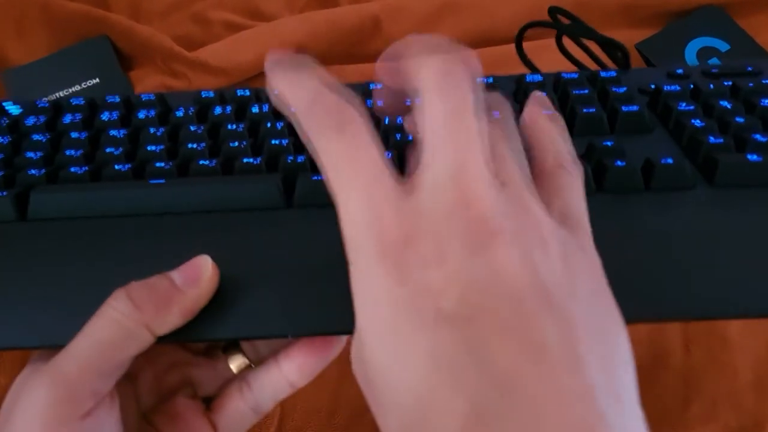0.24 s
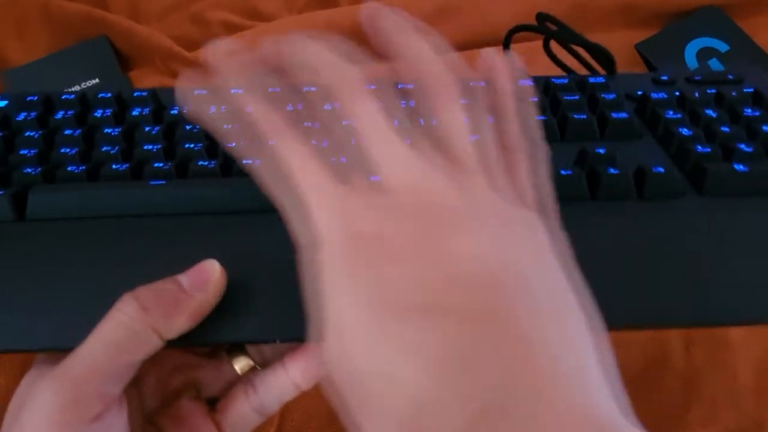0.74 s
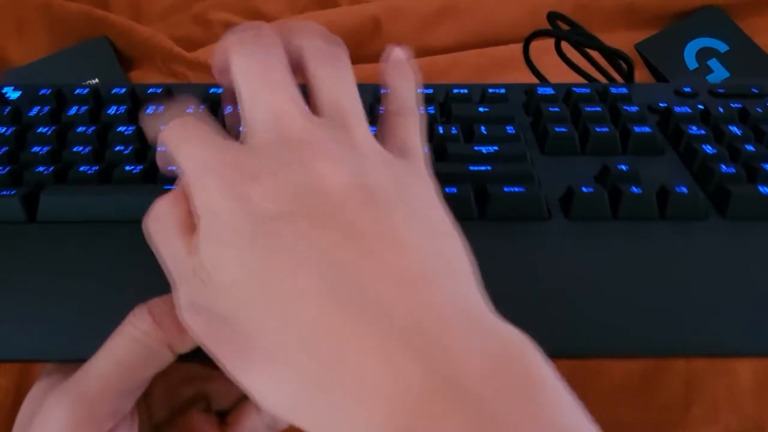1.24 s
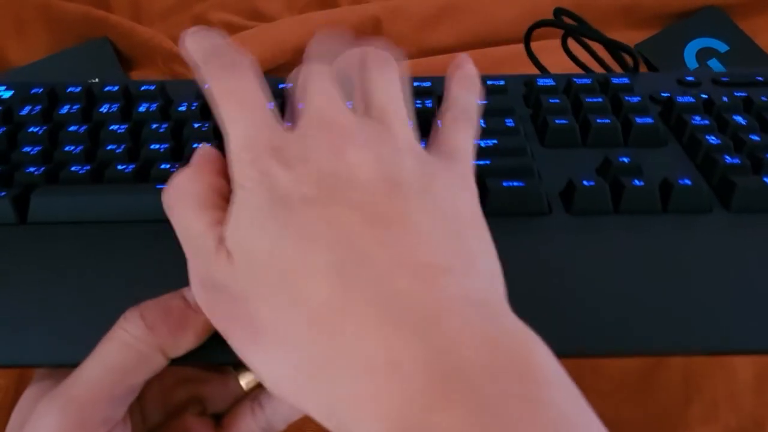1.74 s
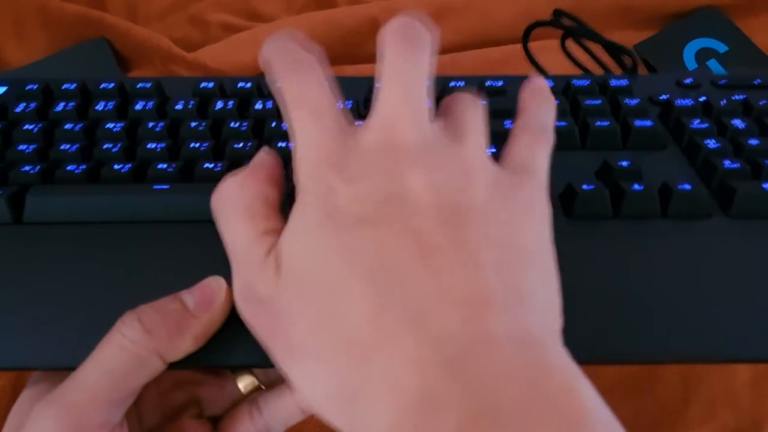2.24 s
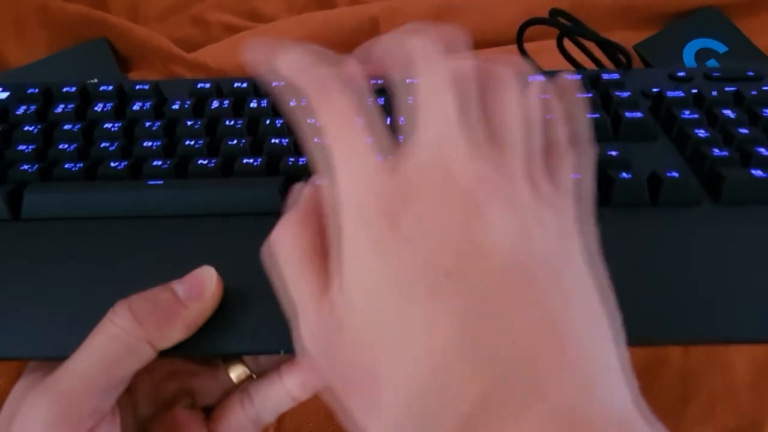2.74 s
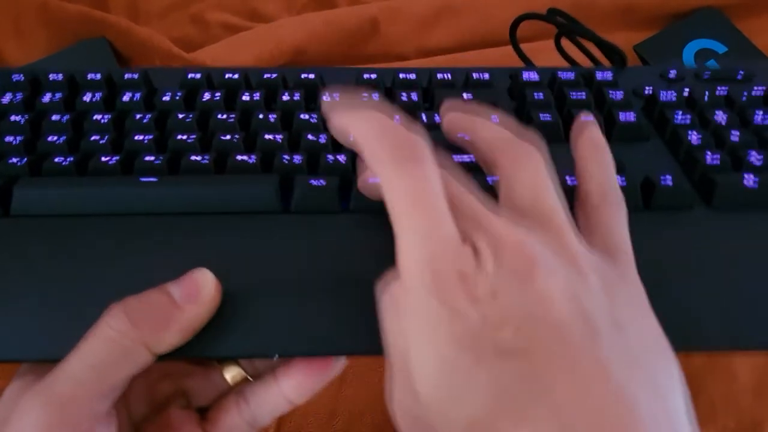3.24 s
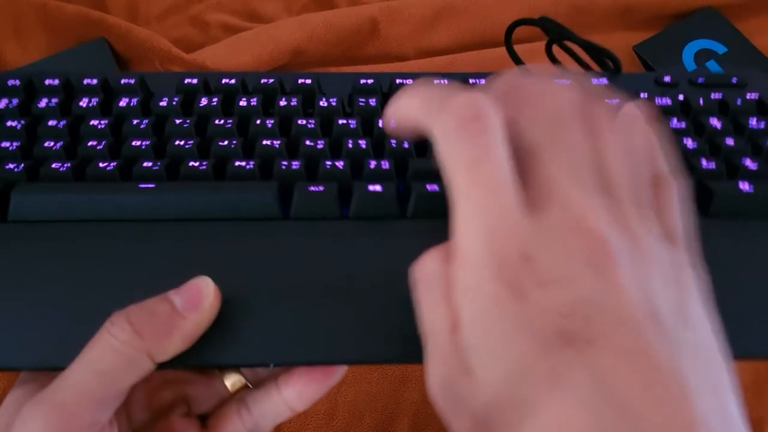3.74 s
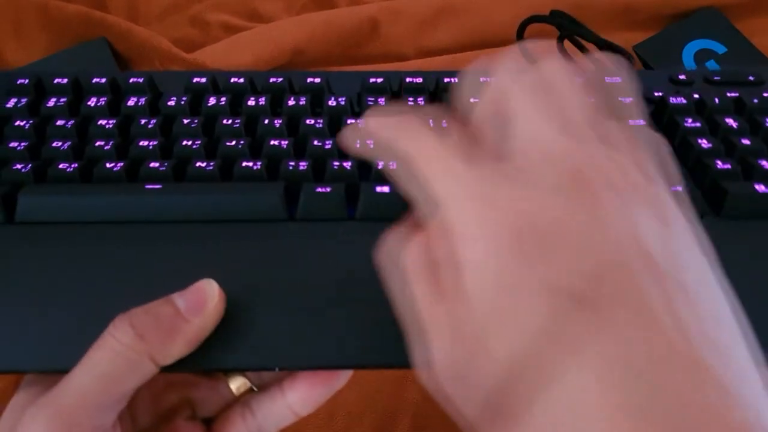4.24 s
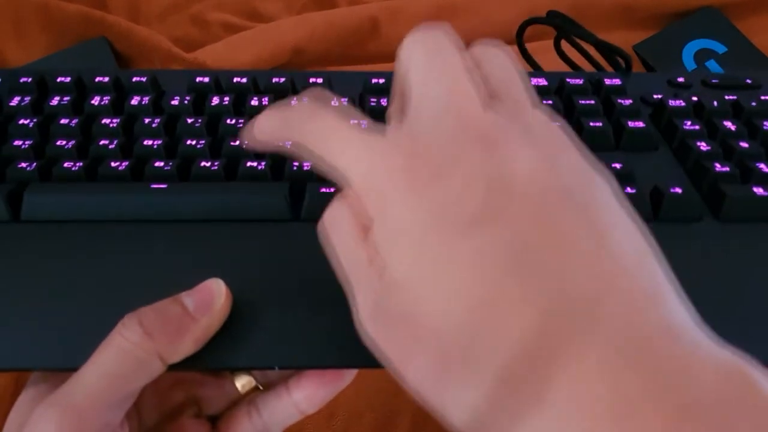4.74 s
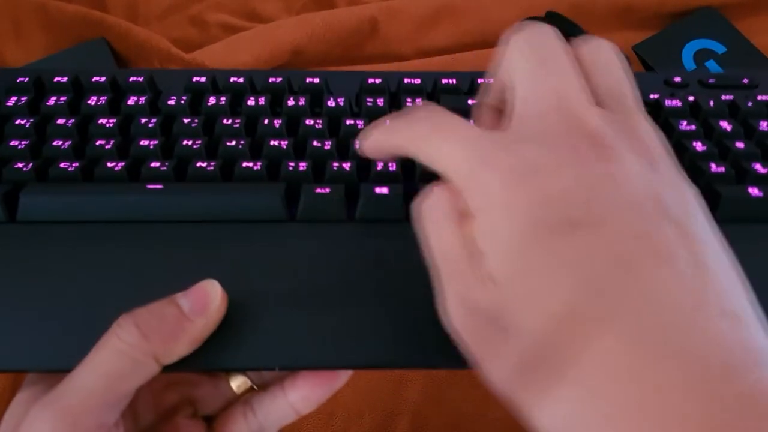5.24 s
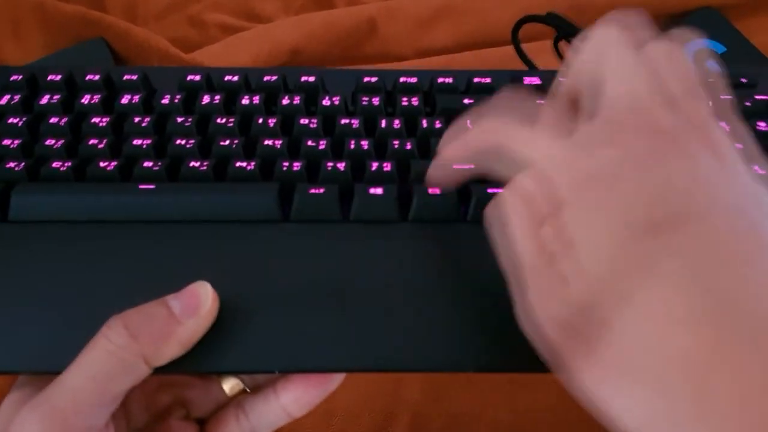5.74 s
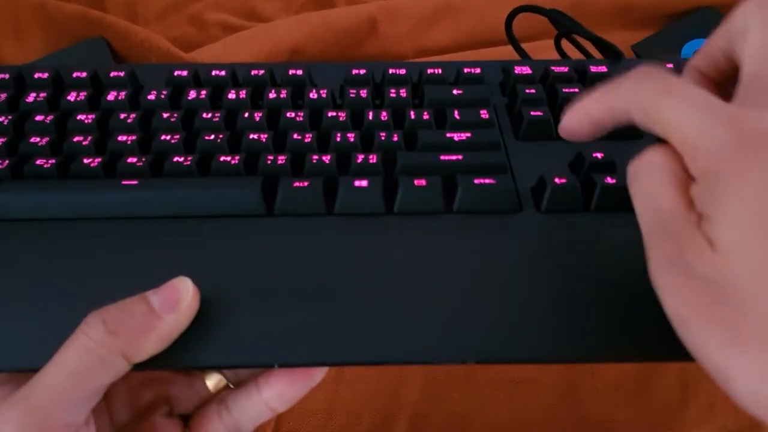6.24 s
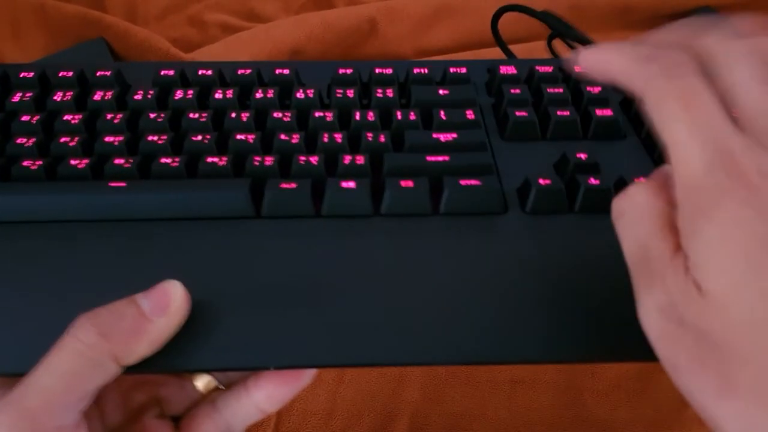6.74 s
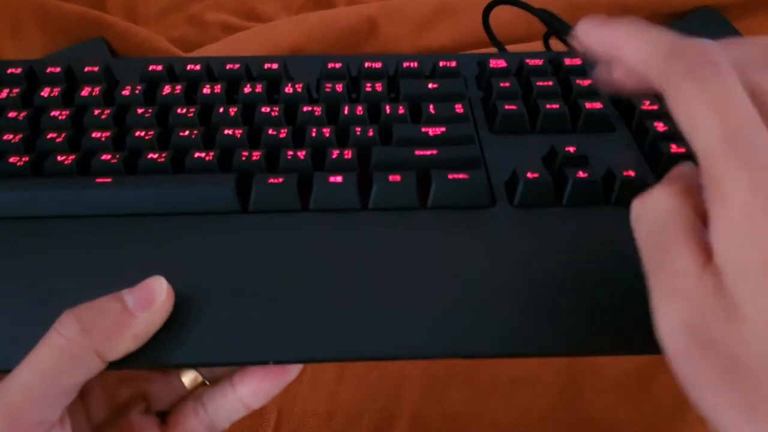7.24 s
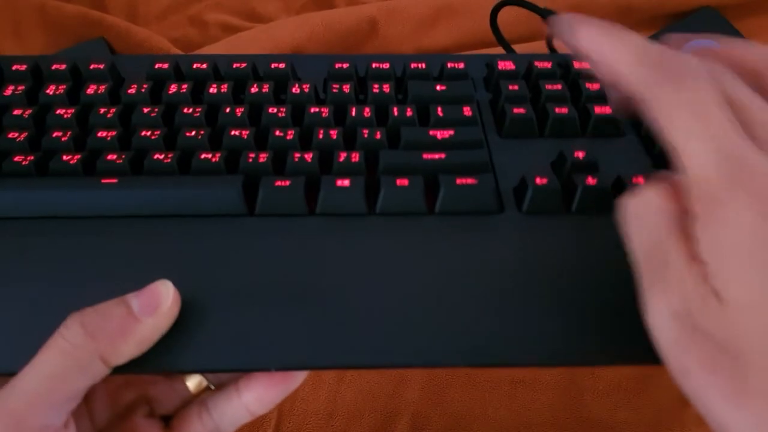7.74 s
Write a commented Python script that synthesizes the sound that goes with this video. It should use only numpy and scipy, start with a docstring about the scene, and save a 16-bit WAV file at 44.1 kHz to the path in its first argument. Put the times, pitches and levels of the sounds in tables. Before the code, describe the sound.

A mechanical keyboard is tested key by key with one hand, close up in a quiet room. About every quarter second a key rattles down with a plastic clack, then snaps back roughly a tenth of a second later, often louder, with a faint springy ring. Soft low bumps come from the held keyboard. Low hum and faint hiss continue throughout; the stereo position shifts slightly, ending on the right.

```python
"""A quiet room hums and hisses throughout while one hand taps a mechanical keyboard on a cloth, close by in stereo.
Each key rattles down, bottoms out, then unlatches with a tick and snaps back up; each blow shakes a spring.
Cracks and noise, filtered by the plastic and metal parts, make the keys; decaying cosines ring the case.
Now and then the held keyboard bumps as a short low swing, or a brushed keycap ticks as filtered noise.
The hand moves left and right and ends on the right, heard as a lag between the microphones."""
import sys
import numpy as np
from scipy import signal
from scipy.fft import rfft, irfft
from scipy.io import wavfile
from scipy.ndimage import uniform_filter1d

SR = 44100
rng = np.random.default_rng(int(sys.argv[2]) if len(sys.argv) > 2 else 0)


def store_wav(level_fs):
    """Save 16-bit WAV to argv[1]."""
    pcm = np.round(np.clip(np.atleast_2d(level_fs), -1, 1) * 32767)
    wavfile.write(sys.argv[1], SR, pcm.T.astype(np.int16))


N = 352800

# keys going down: (time [s], level [dB], extra case thock [dB], brightness [dB], keycap resonance [Hz],
# travel to the bottom [ms], bottoming against the first touch [dB])
KEYS_DOWN = [(0.033, -38.5, 2, -5.5, 3640, 2.2, 19), (0.3114, -51.0, 4, 1.5, 6700, 5.1, -3.5),
             (0.8625, -50, -0.5, 7, 3020, 3, -9.0), (1.1389, -53.5, 8.5, 0.5, 2780, 2.5, -7),
             (1.398, -58.5, 0.5, -2.5, 2950.0, 3.1, -1.5), (1.6704, -46.5, -4, -1, 4300, 8.5, -7.5),
             (1.9528, -45.5, -6.5, -6.0, 1370, 2.1, -1), (2.2315, -48.5, -3.5, 3, 3800, 3.4, -24.0),
             (2.4533, -40.5, -4, 2, 5940, 4.84, 3), (2.903, -45, -1.5, 4, 3020.0, 2.6, 19),
             (3.282, -57.5, 2, 0.5, 2260, 9.2, 3.5), (3.6585, -38, 1, 5, 1220, 8.1, -0.5),
             (3.933, -42.0, -3.5, -1, 1240, 4.34, 4.0), (4.511, -43.5, 2.5, 1, 2800, 4.7, 0),
             (4.8636, -45.5, 6.5, 4, 3080, 11, -5.5), (5.1065, -46, -5, -4.5, 2630.0, 2.8, -28),
             (5.3469, -47, -2, 0.5, 3050, 8.0, -0.5), (5.6814, -50, -3, -4, 2840, 7.9, 1),
             (5.966, -52.5, 5, 0.5, 2310.0, 6.6, -1.5), (6.5675, -54.5, 3.5, -1, 3300, 3.2, -14),
             (6.866, -45, -2.0, -2, 1920, 6.1, -1.0), (7.128, -45.5, -6.5, -2, 1300, 5.1, 6.5),
             (7.3645, -42.5, -3, 0, 3400, 3.8, 2), (7.6348, -55.5, 4.0, 2.5, 4020, 4.1, -7.0),
             (7.8641, -50, 2.5, -0.5, 3580, 3.8, -5)]
# keys snapping back: (time [s], level [dB], extra case thock [dB], brightness [dB], keycap resonance [Hz])
KEYS_UP = [(0.13, -37.5, -4, 1.5, 3140), (0.3994, -43.5, 4, -2.5, 1730), (0.962, -37.0, 6.0, -3, 1530),
           (1.2513, -41.0, -2, 6, 2070), (1.5557, -51, 0.5, 3, 2490.0), (1.787, -42, -11, 5, 3230),
           (2.0639, -42, -7.5, -1.5, 2870), (2.315, -48, -3, 4.5, 1390.0), (2.3228, -50.5, 4, 8, 1210.0),
           (2.558, -39.5, 7.5, 11.0, 6130), (2.9973, -37, 7.5, -2.5, 1540), (3.3877, -35.0, -3.5, 1, 2040),
           (3.7074, -37.5, 6.5, 8.5, 1400), (3.7355, -36, 0.5, -1.5, 1430.0),
           (4.0305, -41.5, 0.5, -7, 1500.0), (4.5679, -37.0, 6.5, -2.5, 1440), (4.5887, -40, 7, 2.0, 3020),
           (4.942, -31.5, 4.5, -3.5, 1340.0), (5.1862, -41.5, 5.5, -2.5, 1400), (5.4322, -39, 1.5, 3, 1360),
           (5.7567, -39.5, 0.5, -4, 1640), (6.0343, -43.0, -1.5, -5.5, 1950.0),
           (6.6473, -39, -6.5, -7, 1400), (6.9501, -36.5, -2, -2.5, 1650), (7.174, -56.5, 10, 1, 1500.0),
           (7.4437, -40.5, 2.5, 7.5, 2830), (7.7107, -52, 6, 1.5, 2920), (7.9387, -36.0, -8, -3, 1740.0)]
# thock, clack, click, tick, fizz: (low edge [Hz], high edge [Hz], nominal ring t60 [s],
# gain of the crack against the ring, room level [dB], room t60 [s], left over right [dB])
KEY_BANDS = [(196, 950, 0.054, 2.27, -14.5, 0.28, 1), (1044, 2355, 0.097, 2.07, -10, 0.25, 0),
             (2190, 4400, 0.049, 1.24, -10, 0.22, 2.5), (4780, 9340, 0.021, 0.58, -10, 0.24, 1),
             (7600, 14500, 0.0098, 0.15, -9.5, 0.18, -0.5)]
# the same five bands: (level in a press [dB], level in a release [dB], share of the brightness followed)
BAND_MIX = [(4, -2, 0.), (3, 1.5, 0.031), (2.53, -6.5, 0.44), (-1.5, -11, 0.93), (-13, -26.5, 1.43)]

SIZE = 12288  # samples in one key sound
T, HZ = np.arange(SIZE) / SR, np.fft.rfftfreq(SIZE, 1 / SR)
LEAD_IN_S = .012  # room ahead of the contact for the noise that leads up to it
SIDES = np.array([[.5], [-.5]])  # splits a difference evenly over left and right
LEVEL_GAIN = np.sqrt(.02 * SR)  # levels count a sound's energy as spread over 20 ms


def amp(db):
    """Decibels to gain."""
    return 10 ** (np.asarray(db) / 20)


def unit(x):
    """Scales to an energy of one per channel, on average."""
    return x / np.sqrt(np.mean(x ** 2) * x.shape[-1] + 1e-20)


def read(points, hz):
    """Reads a table on a log-frequency axis."""
    f, value = np.transpose(points)
    return np.interp(np.log(hz + 1), np.log(f + 1), value)


def add(mix, s, sound):
    """Mixes a stereo sound in at time s."""
    part = mix[:, max(round(s * SR), 0):][:, :sound.shape[1]]
    part += sound[:, :part.shape[1]]


def band(hz, low_hz, high_hz, order=8):
    """Gain of a steep band-pass."""
    low_cut = 1 + (low_hz / (hz + 1)) ** (2 * order)
    high_cut = 1 + (hz / high_hz) ** (2 * order)
    return 1 / np.sqrt(low_cut * high_cut)


def causal(gain):
    """Gives a gain curve the phase of a struck body: nothing sounds before the blow."""
    log_gain = np.log(np.maximum(gain, 1e-4 * gain.max()))
    circle = np.concatenate([log_gain, log_gain[-2:0:-1]])
    return np.exp(np.conj(signal.hilbert(circle)))[:len(gain)]


def pair(same):
    """Two noises with a share of their power in common, one for each microphone."""
    noise, same = rng.standard_normal((3, SIZE)), np.clip(same, 0, 1)
    return np.sqrt(same) * noise[0] + np.sqrt(1 - same) * noise[1:]


def dying(power, t60):
    """Envelope of dense modes that are fed with power and lose 60 dB in t60 seconds."""
    keep = np.exp(-2 * np.log(1000) / (t60 * SR))
    return np.sqrt(signal.lfilter([1], [1, -keep], power))


def ports(s):
    """The two microphones hear a key slightly apart, by where the hand is at time s."""
    # the hand from left (-) to right (+): (time [s], lag of the left microphone [ms])
    hand_path = [(0, 0.088), (.4, 0.098), (.86, -0.097), (1.55, -0.029), (1.95, 0.072), (2.56, 0.16),
                 (2.9, -0.097), (3, -0.075), (3.3, 0.1), (4.03, 0.15), (4.55, -0.089), (5.1, -0.069),
                 (5.3, 0.072), (6.03, 0.15), (6.95, 0.19), (8, 0.21)]
    lag_ms = np.interp(s, *np.transpose(hand_path))
    return np.exp(-2j * np.pi * HZ * lag_ms / 1000 * SIDES)


def air(waver=0.57, bass_left_db=3.5, top_hz=8600):
    """Shaped noise makes room rumble and faint hiss; sines with a wandering phase make the hum."""
    # colour of the room noise: (frequency [Hz], relative density [dB per Hz])
    air_colour = [(12, -36), (20, -8), (33, -1), (82, -4.5), (110, -7.5), (190, -12), (230, -18.5),
                  (300, -11), (420, -17), (750, -20.5), (1050, -25.5), (2800, -36), (4500, -48.5),
                  (8300, -55)]
    # likeness of the two channels: (frequency [Hz], correlation)
    air_likeness = [(30, 0.21), (60, 1), (130, 1), (290, 0.93), (640, 0.22), (1400, -0.44), (3000, 0.086),
                    (15000, -0.11)]
    # swell of the treble hiss: (time [s], level [dB])
    hiss_swell = [(0, 5.5), (.7, 2.5), (1.5, 6.5), (2.8, 3), (3.6, 4), (4.4, 3.5), (5.1, 10.5), (5.65, 5.5),
                  (6.2, 8.5), (7.2, 9), (7.6, 5), (8, 5)]
    # hum tones: (frequency [Hz], level [dB])
    hum_tones = [(48.5, -60.5), (81, -62), (199.5, -68)]
    air_db = -56  # before the hiss swells

    hz, t = np.fft.rfftfreq(N, 1 / SR), np.arange(N) / SR
    a, b = rfft(rng.standard_normal((2, N)))
    same = np.clip(read(air_likeness, hz), -1, 1)
    noise = np.array([a, same * a + np.sqrt(1 - same ** 2) * b])
    noise *= amp(read(air_colour, hz)) * (.1 + band(hz, 0, top_hz, order=20))
    noise *= amp(bass_left_db * SIDES / (1 + (hz / 130) ** 2))  # the bass leans left
    noise *= amp(air_db) / np.std(irfft(noise).mean(0))

    treble = hz ** 2 / (hz ** 2 + 800 ** 2)
    rumble = irfft(noise * (1 - treble))
    hiss = irfft(noise * treble) * amp(np.interp(t, *np.transpose(hiss_swell)))
    out = rumble + hiss
    for hum_hz, db in hum_tones:
        slow_noise = irfft(rfft(rng.standard_normal((2, N))) * (hz < 4))
        drift = np.sqrt(N) * unit(slow_noise)
        out += amp(db) * np.sqrt(2) * np.sin(2 * np.pi * hum_hz * t + waver * drift)
    return out


def bumps(width=0.0067, side_db=13.0, bump_hz=59.3):
    """The cloth damps each bump of the held keyboard to a brief slow swing, stronger on the left."""
    # soft bumps: (time of the middle [s], peak level before the left-right split [dB])
    bump_times = [(0.323, -40.5), (2.431, -38.5), (2.971, -43.5), (4.683, -38.5), (4.755, -38),
                  (4.964, -41), (5.015, -39), (5.104, -38), (6.386, -41.5), (6.472, -36.5)]
    out, t = np.zeros((2, N)), T - T.mean()
    for s, db in bump_times:
        swell = np.exp(-.5 * (t / width) ** 2)
        swing = np.cos(2 * np.pi * (bump_hz * t + rng.random())) * swell
        add(out, s + t[0], amp(db) * swing * amp(side_db * SIDES))
    return out


def contact(at, rise, fall, rattle_db, rebound=0.001724, rebound_db=-3.5):
    """Power of a sharp blow with its quick rebound, and of the tiny collisions of loose plastic around it."""
    t = T - LEAD_IN_S - at
    blow = np.zeros(SIZE)
    blow[np.argmin(abs(t))] = 1
    blow[np.argmin(abs(t - rebound * rng.uniform(.6, 1.5)))] += amp(rebound_db) ** 2
    envelope = np.exp(-np.maximum(-t / rise, t / fall))
    return np.array([blow, (amp(rattle_db) * unit(envelope)) ** 2])


def tick(s, hz, t60=0.026):
    """A small plastic part shifts in its play: a tiny dry tick, about an octave wide."""
    power = contact(0, rise=0.00029, fall=0.00046, rattle_db=-5).sum(0)
    ring = pair(0.77) * dying(power, t60)
    colour = causal(band(HZ, hz / np.sqrt(2), hz * np.sqrt(2), order=5))
    return unit(irfft(rfft(ring) * ports(s) * colour)) * LEVEL_GAIN


def nudges():
    """Fingertips brush loose keycaps without pressing them; each answers with a tick."""
    # brushed keycaps: (time [s], level [dB], pitch [Hz])
    brushes = [(1.3804, -57.5, 2430), (4.579, -46, 900), (7.413, -50, 2330)]
    out = np.zeros((2, N))
    for s, db, hz in brushes:
        add(out, s - LEAD_IN_S, amp(db) * tick(s, hz))
    return out


def spring(cap_hz, width=0.11, t60=0.3, lowest_hz=2500):
    """The spring rings on in a narrow band where the keycap feeds it; a low-pitched cap hardly stirs it."""
    ring = pair(0.26) * amp(-60 * T / t60)
    resonance = causal(1 / (1 + ((HZ / cap_hz - 1) / width) ** 2))
    sing = unit(irfft(rfft(ring) * resonance))
    return sing * band(cap_hz, lowest_hz, SR, order=4) * LEVEL_GAIN


def springs(follow=0.5, spring_db=-19.5):
    """Every press and release shakes a spring, the more the brighter it is."""
    out = np.zeros((2, N))
    for s, db, _, bright_db, cap_hz, *_ in list(KEYS_DOWN) + list(KEYS_UP):
        add(out, s, amp(db + follow * bright_db + spring_db) * spring(cap_hz))
    return out


def case(pitch_hz, reach=0.38, scatter_db=5.5, detune=0.042):
    """The case modes near pitch_hz answer most, a little differently for every blow."""
    # modes of the case: (nominal frequency [Hz], nominal level [dB], t60 [s])
    case_modes = [(192, -19, 0.13), (365, -15, 0.054), (407.6, -13.5, 0.12), (468.5, -10, 0.14),
                  (529, -6, 0.074), (622, -3, 0.05), (707.5, 2, 0.055), (801, 4, 0.039), (950, -5, 0.036)]
    hz, db, t60 = np.transpose(case_modes)[:, :, None]
    luck, shift = rng.standard_normal((2, len(case_modes), 1))
    weight = amp(db + scatter_db * luck) / (1 + (np.log(hz / pitch_hz) / reach) ** 2)
    modes = weight * amp(-60 * T / t60) * np.cos(2 * np.pi * hz * (1 + detune * shift) * T)
    return unit(modes.sum(0))


def keycap(cap_hz, peak_db=7.5, width=0.14, ripple_db=2.5, size=45):
    """Each stroke has one leading resonance, among small peaks and gaps drawn at random."""
    ripple = uniform_filter1d(uniform_filter1d(rng.standard_normal(len(HZ)), size), size)
    ripple = ripple / ripple.std() * np.minimum(HZ / 1500, 1)  # smoother in the bass
    peak = peak_db / (1 + ((HZ / cap_hz - 1) / width) ** 2)
    return causal(amp(ripple_db * ripple + peak))


def reflections(blow, t60, same, delay=0.0057, lumpy_db=0.5, size=90):
    """The room's answer to a blow: reflections arrive in uneven clusters and die away."""
    clusters = uniform_filter1d(rng.standard_normal(SIZE), size) * np.sqrt(size)
    late_blow = np.roll(blow, round(delay * SR))
    return pair(same) * amp(lumpy_db * clusters) * dying(late_blow, t60)


def voicing(blend_db, thock_db, bright_db):
    """Levels of the bands in one blow: thock feeds the case, brightness mostly lifts the small parts."""
    levels_db = blend_db + bright_db * np.transpose(BAND_MIX)[2]
    levels_db[0] += thock_db
    return levels_db


def key(power, delays, pitch_hz, levels_db, colours, hang=1., ring_same=0.15, case_same=0.99, knock_db=-8):
    """A contact cracks and rings every part of the key, and the room answers with a diffuse tail."""
    firm_db, case_octaves_per_db = -37.5, .012  # a case blow firmer than firm_db favours higher modes
    blow, rattle = power
    pitch_hz = pitch_hz * 2 ** (case_octaves_per_db * (levels_db[0] - firm_db))
    force = unit(np.sqrt(blow) + np.sqrt(rattle) * rng.standard_normal(SIZE))
    out = 0
    for k, (db, colour, settings) in enumerate(zip(levels_db, colours, KEY_BANDS)):
        _, _, t60, crack, room_db, room_t60, side_db = settings
        ring = unit(pair(ring_same if k else case_same) * dying(blow + rattle, t60 * hang))
        if k:  # small parts: a crack and a dense ring
            body = rfft(crack * force + ring)
        else:  # the case: the hardest blow rings a few low modes over a dull knock
            modes = np.roll(case(pitch_hz), blow.argmax())
            knock = unit(irfft(rfft(ring) * colour))
            body = rfft(crack * modes + amp(knock_db) * knock)
        direct = unit(irfft(body * colour * delays)) * amp(side_db * SIDES)
        echoes = reflections(blow, room_t60, same=0 if k else .5)
        room = amp(room_db) * unit(irfft(rfft(echoes) * colour))
        out = out + amp(db) * (direct + room)
    return out * LEVEL_GAIN


def presses(colours, case_hz=646):
    """The finger meets the cap, and a few milliseconds later the stem hits the bottom."""
    out = np.zeros((2, N))
    for s, db, thock_db, bright_db, cap_hz, travel_ms, bottom_db in KEYS_DOWN:
        touch = contact(0, rise=0.0014, fall=0.0003, rattle_db=0.0)
        bottom = contact(travel_ms / 1000, rise=0.0012, fall=0.0011, rattle_db=-2)
        power = touch / touch.sum() + amp(bottom_db) ** 2 * bottom / bottom.sum()
        levels_db = db + voicing(np.transpose(BAND_MIX)[0], thock_db, bright_db)
        voice = colours * keycap(cap_hz)
        blow = key(power, ports(s), case_hz, levels_db, voice, hang=0.65, knock_db=-6.0)
        add(out, s - LEAD_IN_S, blow)
    return out


def releases(colours, swell_db=-22, case_hz=753):
    """The switch unlatches with a tick and snaps against its stop."""
    unlatch_s, unlatch_db, unlatch_hz = 0.0087, -20, 3400  # lead, level against the release, pitch
    out = np.zeros((2, N))
    for s, db, thock_db, bright_db, cap_hz in KEYS_UP:
        power = contact(0, rise=0.00047, fall=0.0028, rattle_db=-8)
        power[1] += (amp(swell_db) * unit(T * (T < LEAD_IN_S))) ** 2  # faint noise swells up to the snap
        levels_db = db + voicing(np.transpose(BAND_MIX)[1], thock_db, bright_db)
        voice = colours * keycap(cap_hz)
        snap = key(power, ports(s), case_hz, levels_db, voice, hang=0.76, knock_db=-12)
        add(out, s - LEAD_IN_S, snap)
        add(out, s - LEAD_IN_S - unlatch_s, amp(db + unlatch_db) * tick(s, unlatch_hz))
    return out


def typing():
    """Presses are a rattling touch and a bottoming blow; releases a tick, a faint swell of noise and a snap."""
    # colour of the plastic and metal parts: (frequency [Hz], level [dB])
    parts_colour = [(1100, -4), (1400, -3), (1850, -3.5), (2300, -5), (2950, 2.5), (3900, -4), (5800, -15),
                    (7300, -17), (9000, -24.5), (10400, -22), (12700, -22.5), (14400, -24), (16000, -22)]
    body = amp(read(parts_colour, HZ))
    colours = np.array([causal(body * band(HZ, low, high)) for low, high, *_ in KEY_BANDS])
    return presses(colours) + releases(colours)


def scene():
    """Room, handling, springs and keys together."""
    return air() + bumps() + nudges() + springs() + typing()


def record(dry, edge_hz=16750):
    """The recorder's band limit: a steep low-pass."""
    low_pass = signal.firwin(511, edge_hz, window=("kaiser", 9), fs=SR)
    return signal.oaconvolve(dry, low_pass[None], "same")


dry = scene()
out = record(dry)
store_wav(out)
```